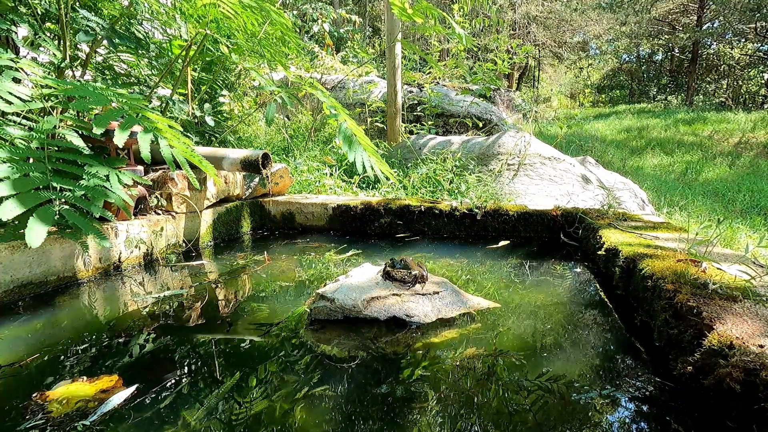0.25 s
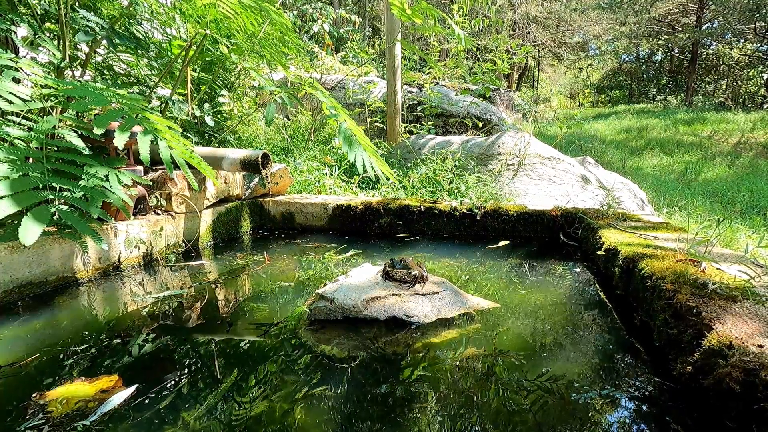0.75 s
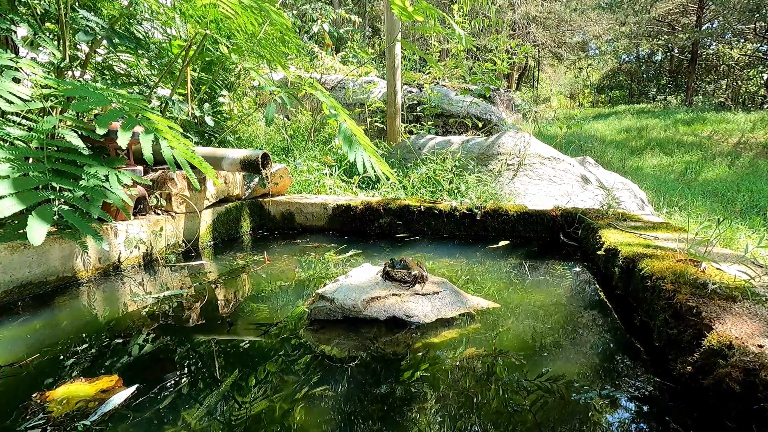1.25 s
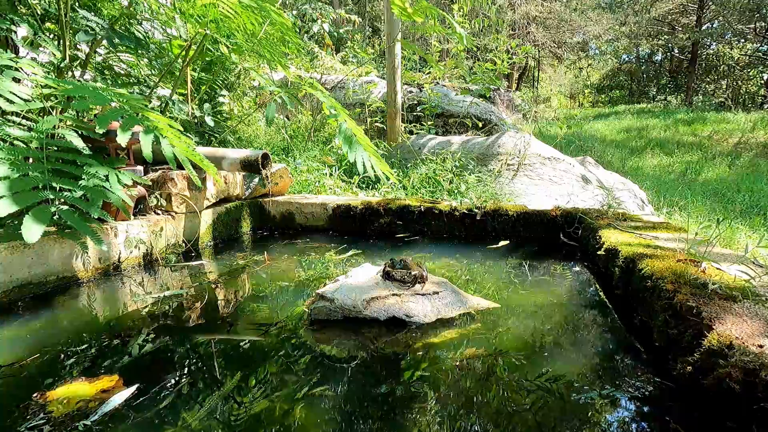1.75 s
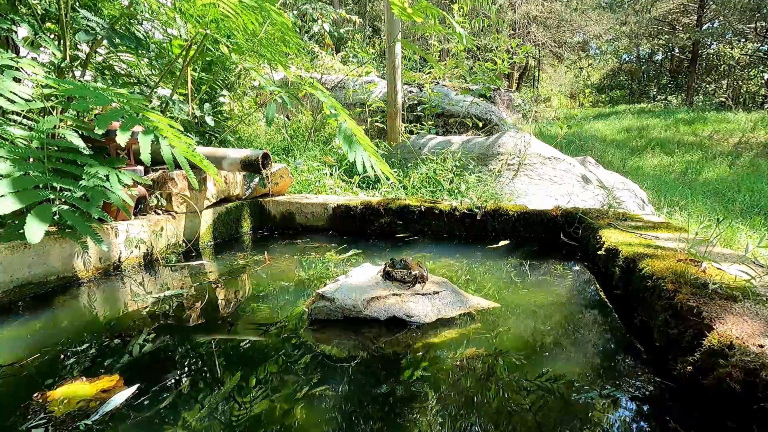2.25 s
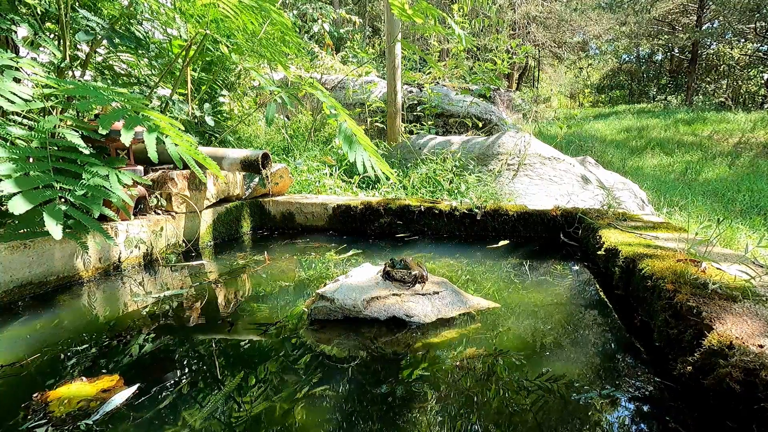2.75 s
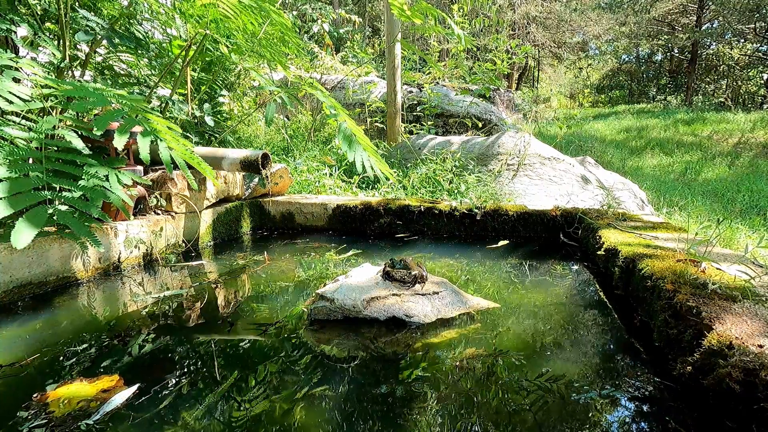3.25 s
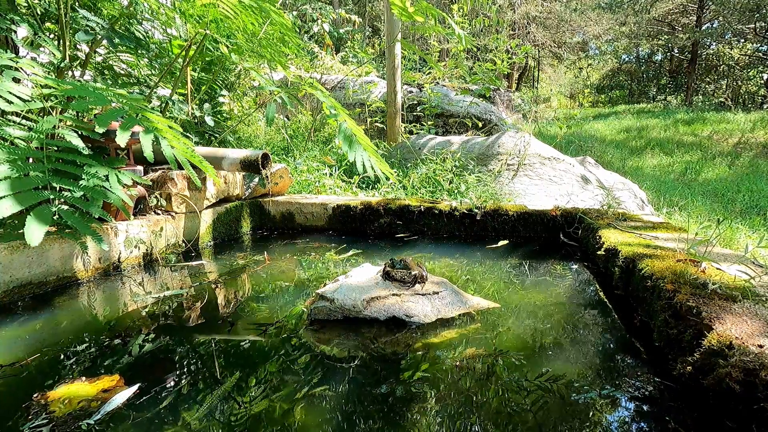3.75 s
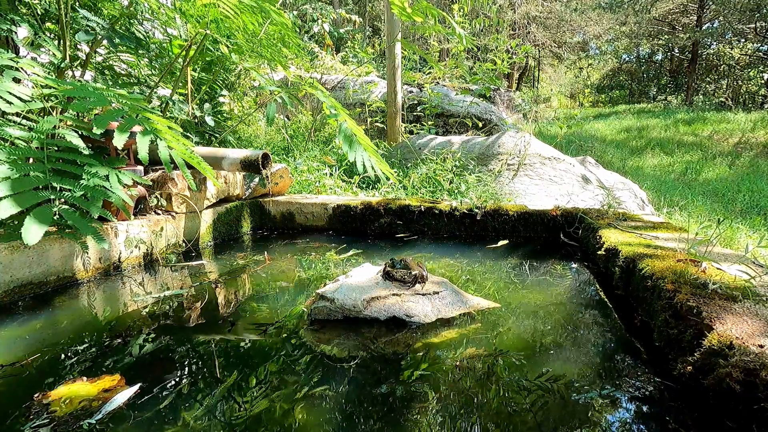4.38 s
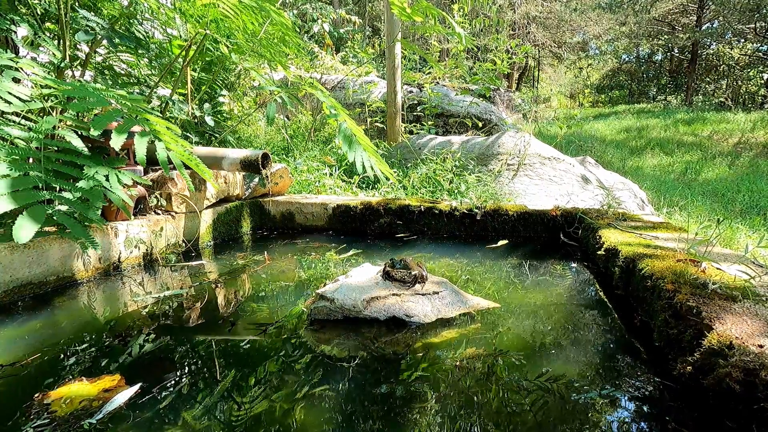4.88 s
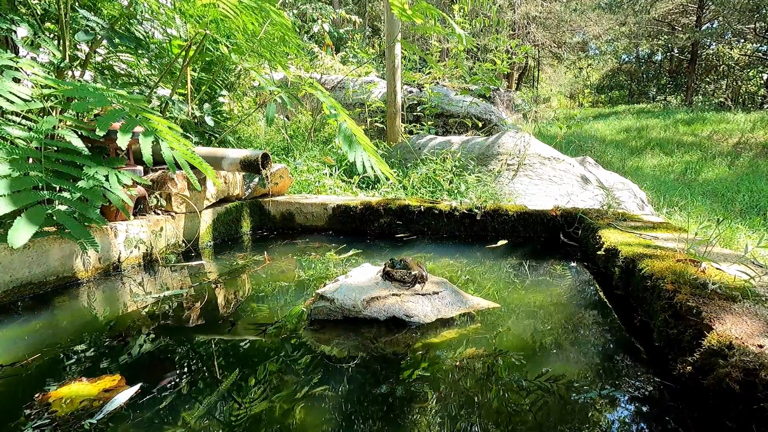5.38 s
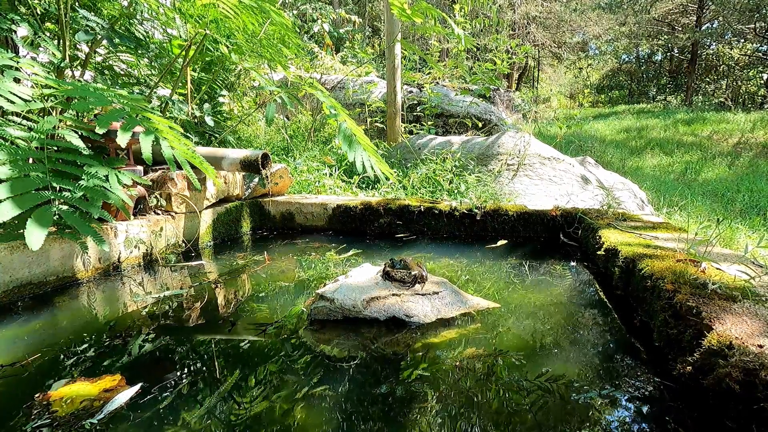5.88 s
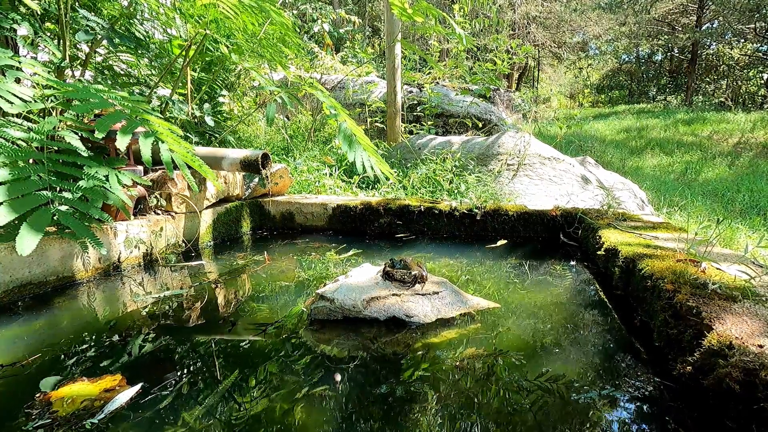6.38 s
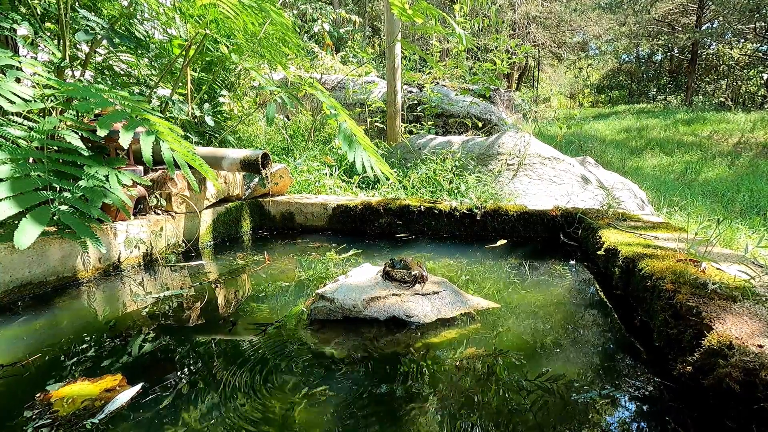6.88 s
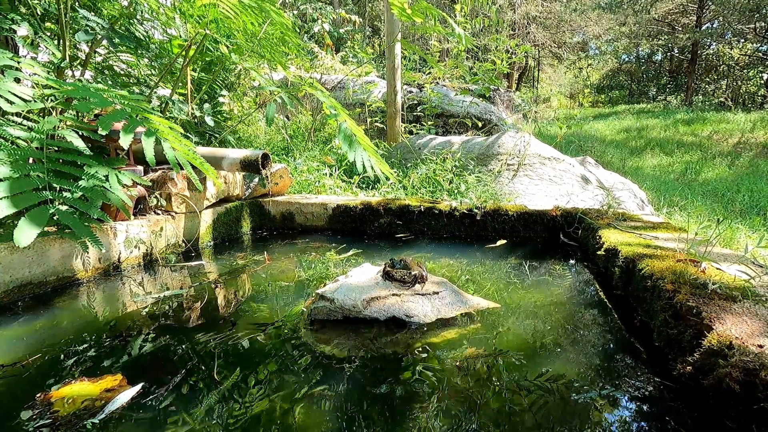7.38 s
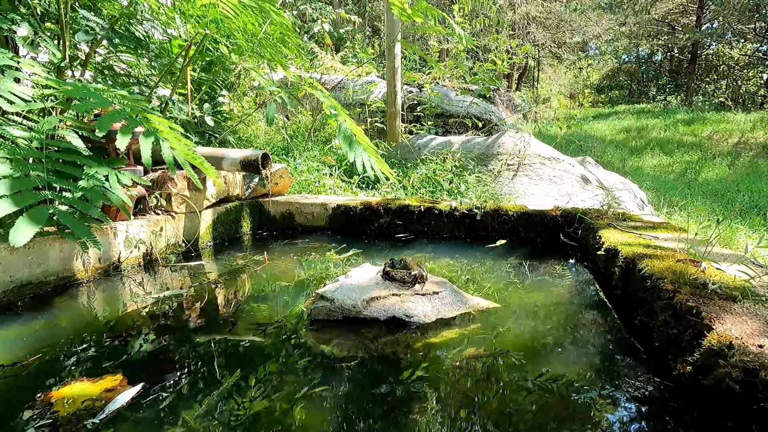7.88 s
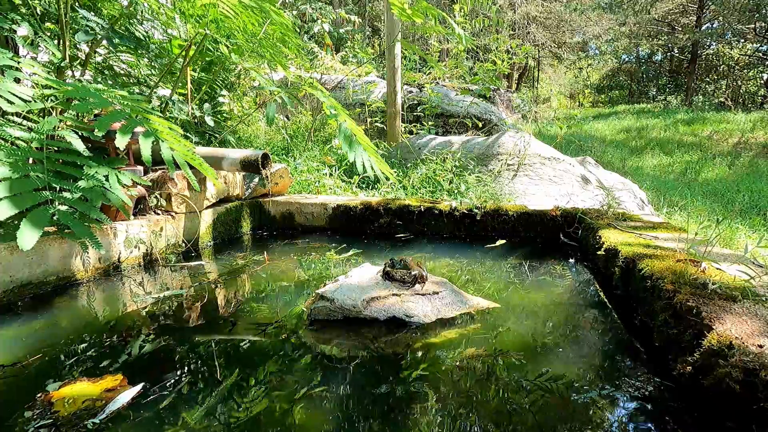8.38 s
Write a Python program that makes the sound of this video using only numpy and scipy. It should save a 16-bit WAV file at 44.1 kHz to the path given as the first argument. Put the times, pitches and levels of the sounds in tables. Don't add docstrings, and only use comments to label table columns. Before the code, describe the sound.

A steady outdoor insect chorus in stereo: dry, buzzing cicadas pulsing in slow swells, fast high crickets trilling to the left, a faint airy katydid rasp on top and barely audible high ticks early on. Distant insects blur into a soft mid-pitched drone. Low wind thumps softly against the microphone, strongest past the middle, then eases as small regular chips appear on the left.

```python
import sys
import numpy as np
from scipy import signal
from scipy.fft import rfft, irfft, next_fast_len
from scipy.io import wavfile
from scipy.ndimage import uniform_filter1d

SR = 44100
rng = np.random.default_rng(int(sys.argv[2]) if len(sys.argv) > 2 else 0)


def log_audio(samples):
    frames = np.atleast_2d(samples).T
    limited = np.clip(frames, -1, 1)
    pcm = np.round(limited * 32767).astype(np.int16)
    wavfile.write(sys.argv[1], SR, pcm)


def linear_from_db(decibels):
    return 10 ** (np.asarray(decibels, float) / 20)


N = 380573
T = np.arange(N) / SR
PAD = next_fast_len(N)
HZ = np.maximum(np.arange(PAD // 2 + 1) * SR / PAD, 1)

# (frequency [Hz], density [dB per Hz])
WIND_COLOUR = [(11, -30.5), (18, -5), (43, 3.5), (102, -5.5), (140, -4), (172, -9), (292, -13.5),
               (359, -24.5), (600, -38.5), (780, -48.5), (1320, -120)]
# (time [s], level [dB])
BREEZE = [(0.0, -52.5), (1.49, -57), (1.58, -53), (1.95, -57), (4.18, -51.5), (4.37, -47.5), (5.14, -50.5),
          (5.53, -49), (5.77, -50), (6.18, -44), (6.25, -47), (6.49, -43.5), (7.02, -55.5), (7.35, -43),
          (7.45, -54.5), (8.0, -51.5), (8.05, -52), (8.63, -54)]
# (centre [Hz], level in calm air [dB], gain per dB of breeze [dB])
EDDIES = [
    (40, -53, 0.02),
    (115, -54.5, 1.0),
    (260, -62.5, 0.9144),
]
# (time [s], length [s], level over the breeze [dB], eddy frequency [Hz])
GUSTS = [(.02, 0.075, 3, 40), (0.316, 0.12, 13, 40), (0.608, 0.28, 13, 40), (0.913, 0.076, 7, 40),
         (1.36, 0.24, -23, 60), (1.44, 0.12, 7.5, 260), (1.652, .14, 6, 55), (1.855, 0.46, 3.5, 260),
         (2.076, 0.3, -3, 45), (2.3, 0.2, -19, 50), (2.57, 0.095, 8.5, 260), (2.84, 0.13, 3, 40),
         (3.328, 0.23, 8, 55), (3.476, 0.096, -12, 40), (3.56, .1, 6, 40), (4.258, 0.051, 13, 45),
         (4.5, .3, -2, 90), (5.1, 0.76, 3, 40), (5.192, 0.086, -19, 70), (5.707, 0.24, 4.5, 330),
         (5.81, .16, -19, 100), (6.073, 0.32, 3.5, 220), (6.467, 0.43, 6, 135), (6.76, 0.27, -18, 40),
         (6.993, 0.18, -7, 260), (7.324, 0.37, 6, 40), (7.6, 0.24, 5.5, 40), (7.895, 0.33, -0.5, 150),
         (8.2, 0.38, 7, 40), (8.39, 0.18, -3, 40)]
# (frequency [Hz], density [dB per Hz])
FAR_COLOUR = [(210, -28.5), (350, -5.5), (522, -10), (656, -9.5), (1310, -0.5), (2460, -8), (2980, -8),
              (3400, -6.5), (4420, -30), (7480, -120)]
# (frequency [Hz], density [dB per Hz])
CHORUS_COLOUR = [(1650, -34), (2800, -21), (3290, -14.5), (3830, -2.5), (4450, -2.5), (5070, -0.5),
                 (5370, 0.5), (5920, 0.5), (6790, 0), (7400, -1.5), (9620, -25.5), (16300, -120)]
# (frequency [Hz], width [Hz], level [dB])
TYMBAL = [
    (4070, 500, -9),
    (4850, 600, -8),
    (5540, 350, -3),
    (5880, 170, 2),
    (6100, 300, -3),
    (6600, 700, -9),
]
# (cut-off time [s], rise [s], hold [s], fall [s], level over rest [dB])
SWELLS = [(0.0, .3, .05, 0.24, 8), (1.3, 0.59, 0.041, 0.031, 8.5), (2.48, 0.37, .08, 0.025, 9),
          (3.66, .35, 0.22, 0.044, 8), (4.58, .55, 0.072, 0.11, 12.5), (5.57, 0.44, .1, 0.16, 12),
          (6.69, 0.45, 0.11, 0.28, 10), (7.78, .3, 0.13, 0.19, 10), (8.7, .25, 0.024, .1, 6)]
# (cut-off time [s], rise [s], hold [s], fall [s], level over rest [dB])
ANSWERS = [(.85, .35, .25, 0.17, 2.5), (1.85, 0.36, 0.076, 0.21, 2.5), (3.06, 0.086, .25, 0.078, 2),
           (4.1, 0.19, 0.036, 0.065, 3.5), (6.0, 0.16, 0.047, 0.26, 3), (7.18, .2, 0.092, .1, 3.5),
           (8.3, .5, .1, 0.083, 2.5)]
# (frequency [Hz], density [dB per Hz])
MEADOW_COLOUR = [(6800, -47), (7200, -5), (7400, -1.5), (8000, -0.5), (8400, -6), (8650, -12.5),
                 (8900, -18.5), (9500, -27), (9800, -38)]
# (wing tone [Hz], pulse rate [per s], first pulse time [s], pulse length [ms], level [dB], left minus right [dB])
CRICKETS = [(7500, 14.6, .02, 22, -60, 5), (7600, 13.89, .016, 18, -64, -3), (7340, 15.66, .03, 16, -65, 6),
            (8130, 58.6, .0065, 4, -60, 6), (8305, 58.6, .009, 12, -60.5, 7),
            (8310, 53.3, .004, 16, -62, 7), (8485, 61.8, .004, 14, -66, 7), (8150, 49.5, .004, 12, -63, 5),
            (8620, 30.0, .004, 12, -74, 2), (7790, 28.1, .004, 30, -69, 7)]
# (end time [s], rise [s], hold [s], fall [s], level over rest [dB])
NEAR_CRICKET_PHRASES = [
    (7.5, 3.2, 5.1, .1, 12),
    (8.47, .05, .27, .03, 13.5),
]
# (end time [s], rise [s], hold [s], fall [s], level over rest [dB])
KATYDID_PHRASES = [(.13, .1, .2, .05, 9), (1.34, 1.5, .5, .05, 4), (2.26, .4, .06, .05, 4.5),
                   (3.87, .45, .7, .05, 8.5), (4.62, .3, .6, .05, 2.5), (6.68, .35, .7, .07, 9),
                   (7.5, .3, .7, .3, 2), (8.43, .15, .25, .04, 5), (8.68, .1, .05, .05, 3)]
# (frequency [Hz], density [dB per Hz])
HISS_COLOUR = [(9300, -18), (9800, -4), (11000, -2), (12200, 0), (13200, -2), (14400, 0), (15700, -2),
               (17000, -14)]
# (time [s], peak level [dB])
TICKS = [(.32, -73), (.8, -72), (1.15, -72), (1.48, -70), (1.835, -70), (2.11, -70), (2.43, -72),
         (2.75, -71), (3.04, -70), (3.34, -72), (3.76, -70), (4.065, -70), (4.445, -69)]
# (time [s], peak level [dB], frequency [Hz], left minus right [dB])
CHIPS = [
    (4.7885, -58.5, 8870, 9),
    (7.6904, -59, 9130, 3.5),
    (7.8994, -59.5, 9180, 3.0),
    (8.1094, -59.5, 9300, 4.5),
    (8.3125, -58, 9280, 4.5),
    (8.5215, -60, 9090, 3.5),
]


def level(x, db):
    return x * linear_from_db(db) / np.sqrt(np.mean(x ** 2))


def pan(db):
    return linear_from_db(np.array([[db / 2], [-db / 2]]))


def flicker(rate, db):
    k = int(SR / rate)
    steps = np.repeat(rng.standard_normal(N // k + 1), k)
    smooth = uniform_filter1d(uniform_filter1d(steps, k), k)
    return linear_from_db(db * 1.37 * smooth[:N])


def phrases(table):
    out = np.zeros(N)
    for end, rise, hold, fall, db in table:
        climb = np.clip(1 + (T - end + hold) / rise, 0, 1)
        decay = np.exp(-np.maximum(T - end, 0) / fall)
        out = np.maximum(out, db * climb * decay)
    return out


def diffuse(colour, alike, lag, pan_db, lo_hz=0, hi_hz=SR):
    hz, db = np.transpose(colour)
    gain = linear_from_db(np.interp(np.log(HZ), np.log(hz), db, -90, -90))
    gain = gain / np.sqrt((1 + (lo_hz / HZ) ** 6) * (1 + (HZ / hi_hz) ** 6))
    common, left, right = rfft(rng.standard_normal((3, PAD)))
    alike = np.clip(alike, 0, 1)
    shared = np.sqrt(alike) * common * np.exp(1j * np.array([[-lag], [0]]))
    own = np.sqrt(1 - alike) * np.array([left, right])
    return level(irfft((shared + own) * gain, PAD)[:, :N], 0) * pan(pan_db)


def trees(x, t60, wet_db, lag=0):
    t = np.arange(int(.4 * SR)) / SR
    echoes = rng.standard_normal((2, len(t))) * 1000. ** (-t / t60) * (t > .002)
    echoes *= linear_from_db(wet_db) / np.sqrt(np.sum(echoes ** 2, axis=1, keepdims=True))
    echoes[0, 0] = echoes[1, lag] = 1
    return level(signal.fftconvolve(x[None], echoes, axes=1)[:, :N], 0)


def eddies():
    s, length, gust_db, hz = np.transpose(GUSTS)
    bumps = np.exp(-8 * ((T - s[:, None]) / length[:, None]) ** 2)
    calm_breeze_db, reach_octaves = -54, 0.65
    breeze = np.interp(T, *np.transpose(BREEZE)) - calm_breeze_db
    levels = []
    for centre_hz, calm_db, gain in EDDIES:
        nearness = np.exp(-(np.log2(hz / centre_hz) / reach_octaves) ** 2)
        levels.append(calm_db + gain * breeze + (gust_db * nearness) @ bumps)
    return levels


def wind():
    deep, buffet, flutter = eddies()
    out = linear_from_db(deep + 0.2) * flicker(11, 2.1) * diffuse(WIND_COLOUR, 0.92, 0.025, -0.16, hi_hz=74.3)
    out = out + linear_from_db(buffet - 1.67) * flicker(22, 1.2) * diffuse(WIND_COLOUR, 0.96, 0.056, .2, lo_hz=67.5, hi_hz=189)
    return out + linear_from_db(flutter + 1.16) * flicker(11, 1.8) * diffuse(WIND_COLOUR, 0.78, 0.12, -2.8, lo_hz=190.0)


def far_brood():
    swell = phrases([(4.2, 2.4, 2.2, 1.0, 1.8)])
    return linear_from_db(-62.5 + swell) * flicker(0.85, 0.57) * diffuse(FAR_COLOUR, 0.53, 0.56, 0.42)


def tymbal_song():
    chance = rng.standard_normal((int(150 * N / SR), 3))
    at = np.cumsum((1 + .05 * chance[:, 0]) / 125)
    clicks = np.zeros(N)
    for rib_ms, rib_db, jitter in ((0, -7.5, chance[:, 1]), (2.6, -14, chance[:, 2])):
        place = ((at + (rib_ms + .3 * jitter) / 1000) * SR).astype(int)
        inside = place < N
        clicks[place[inside]] = linear_from_db(rib_db + 1.9 * jitter[inside])
    body = np.zeros(N)
    for k, (hz, width, db) in enumerate(TYMBAL):
        ring = signal.lfilter(*signal.iirpeak(hz, hz / width, SR), clicks)
        body += (-1) ** k * linear_from_db(db) * ring
    return signal.sosfilt(signal.butter(4, [3600, 7400], "band", fs=SR, output="sos"), body)


def cicadas():
    swell, answer = phrases(SWELLS), phrases(ANSWERS)
    growth_db = 0.42 * T
    chorus_db = -59.5 + growth_db + np.maximum(0.51 * swell, answer)
    answer_db = -68.5 + growth_db + 3.1 * answer
    singer_db = -62 + 0.7 * T + np.maximum(swell, .4 * answer)
    chorus = flicker(14, .5) * diffuse(CHORUS_COLOUR, .78, .45, .7)
    deeper = linear_from_db(answer_db) * diffuse(CHORUS_COLOUR, .7, 0.32, .7, hi_hz=4500)
    body = tymbal_song() * linear_from_db(singer_db + 0.71 * np.minimum(singer_db + 52.0, 0))
    far = trees(body, .1, 0)
    sac = signal.lfilter(*signal.iirpeak(5880, 150, SR), body)
    shared = far.mean(axis=0) + level(sac, -11)
    singer = level(0.72 * shared + 0.32 * far, -53.5)
    return linear_from_db(chorus_db + 6.0) * chorus + deeper + singer


def trill(hz, rate, first, ms):
    turns = (T - first) * rate + .5
    stroke = turns.astype(int)
    t = (turns - stroke - .5) / rate
    chance = rng.standard_normal((stroke[-1] + 1, 2))
    size = linear_from_db(1.4 * chance[:, 0])[stroke]
    slip = np.cumsum(1.6 * chance[:, 1])[stroke]
    return size * np.exp(-.5 * (t / (ms / 4000)) ** 2) * np.cos(2 * np.pi * hz * t + slip)


def crickets():
    out = linear_from_db(-53.0) * flicker(22, 0.18) * diffuse(MEADOW_COLOUR, 0.042, -0.95, 7.4)
    for hz, rate, first, ms, db, pan_db in CRICKETS:
        song = trees(trill(hz, rate, first, ms), .05, -4, lag=2)
        out = out + linear_from_db(db) * pan(pan_db) * flicker(1.5, 1.5) * song
    near = trees(trill(7620, 13.32, .0095, 20), .05, -7, lag=2)
    return out + linear_from_db(-72 + phrases(NEAR_CRICKET_PHRASES)) * pan(8) * near


def katydid():
    db = -85 + phrases(KATYDID_PHRASES)
    rasp = np.exp(3 * (np.cos(2 * np.pi * (79.89 * T - .37)) - 1))
    file = diffuse([(13300, -25), (14000, -3), (14500, 0), (15100, -6), (15700, -25)], .05, 0, 10)
    hiss = linear_from_db(db + 4.0) * flicker(25, 1.7) * diffuse(HISS_COLOUR, .03, 0, 5.0)
    return hiss + linear_from_db(db + 1.5 * np.minimum(db + 76, 0) + 2.5) * rasp * file


def rough_notes(table, ms, spread_hz, trim_db):
    out = np.zeros((2, N))
    t = np.arange(int(2 * ms / 1000 * SR)) / SR
    shape = np.exp(-.5 * ((t - ms / 1800) / (ms / 4000)) ** 2)
    for s, db, hz, pan_db in table:
        band = signal.butter(3, [hz - spread_hz / 2, hz + spread_hz / 2], "band", fs=SR, output="sos")
        rough = signal.sosfilt(band, rng.standard_normal(8192))[-len(t):]
        note = level(rough * shape, db + trim_db) * pan(pan_db)
        i = int(s * SR)
        out[:, i:i + len(t)] += note[:, :N - i]
    return out


def ticks():
    return rough_notes([(s, db, 10270, 0) for s, db in TICKS], 73, 400, -11.0)


def chips():
    return rough_notes(CHIPS, 54, 350, -12)


def scene():
    return wind() + far_brood() + cicadas() + crickets() + katydid() + ticks() + chips()


def top_cut(x):
    return signal.sosfilt(signal.butter(12, 15720, fs=SR, output="sos"), x)


def record(dry):
    return top_cut(dry)


dry = scene()
out = record(dry)
log_audio(out)
```